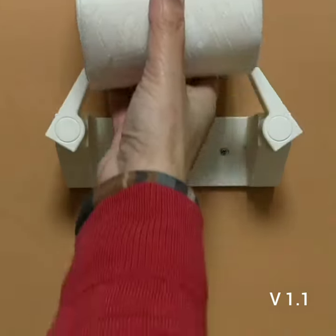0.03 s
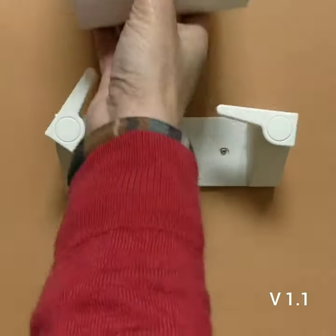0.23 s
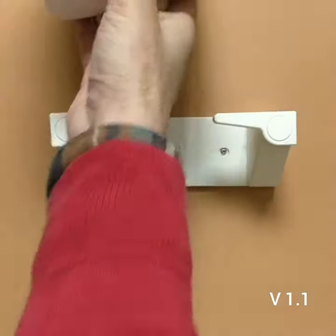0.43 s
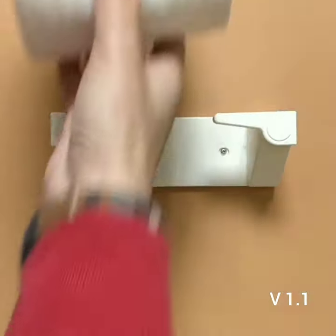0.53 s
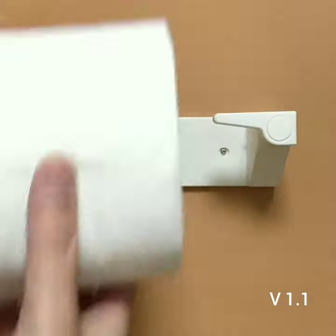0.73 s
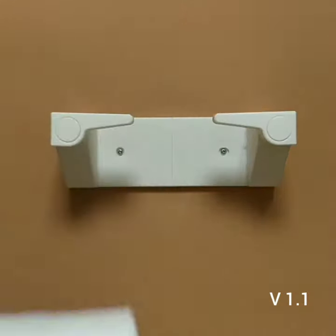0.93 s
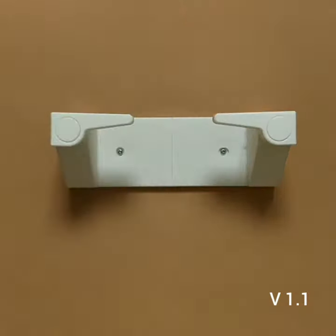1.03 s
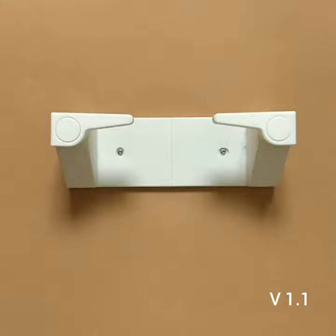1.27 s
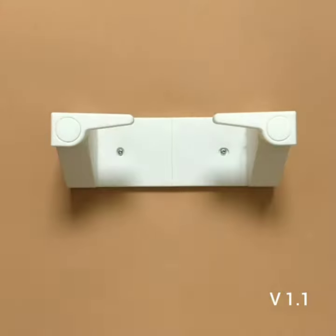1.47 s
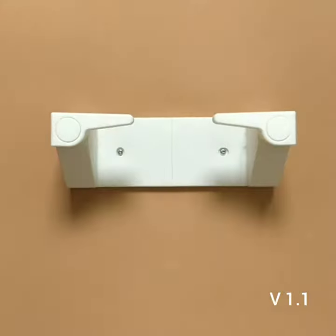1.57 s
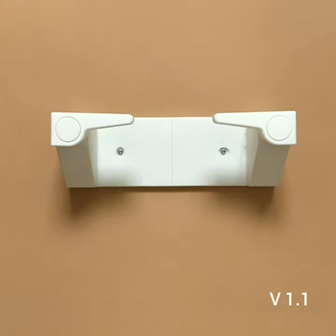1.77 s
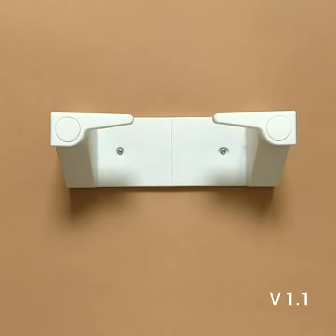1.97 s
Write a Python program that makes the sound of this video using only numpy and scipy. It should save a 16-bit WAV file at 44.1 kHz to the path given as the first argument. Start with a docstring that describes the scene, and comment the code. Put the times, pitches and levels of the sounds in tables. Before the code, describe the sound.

Plastic clacks twice as a paper roll is lifted from its holder: a brief humming rub, then one arm snaps down and rattles, followed by the other. A faint brush of paper leaves only quiet room tone and soft hiss.

```python
"""A paper roll is lifted out of a plastic wall holder in a quiet room. First it rubs along the two
hinged arms: stick-slip friction makes the mount hum, and the paper scratches. The right arm drops
shut at about 0.2 s and the left at 0.4 s; each cracks, bounces and rattles, every impact exciting
the arm's modes and swelling into a hollow knock of the mount. Near 0.75 s the roll brushes faintly
past, leaving only room tone and a soft recorder hiss."""
import sys
import numpy as np
from scipy import signal
from scipy.fft import rfft, irfft
from scipy.io import wavfile
from scipy.ndimage import uniform_filter1d

SR = 44100
rng = np.random.default_rng(int(sys.argv[2]) if len(sys.argv) > 2 else 0)


def generate_wav(sig):
    """Save sig (samples, or channels by samples) to the path in sys.argv[1] as 16-bit PCM at SR."""
    pcm = np.round(np.clip(np.atleast_2d(sig).T, -1, 1) * 32767).astype(np.int16)
    wavfile.write(sys.argv[1], SR, pcm)


N = 88200
TIME = np.arange(N) / SR
RING_TIME = TIME[:SR // 3]


def from_db(db):
    """Amplitude grows tenfold per 20 dB."""
    return 10 ** (np.asarray(db) / 20)


def rms_one(x):
    """Normalisation to unit mean power."""
    return x / np.sqrt(np.mean(x ** 2) + 1e-20)


def level(curve):
    """Amplitude envelope through (time [s], level [dB]) points."""
    return from_db(np.interp(TIME, *np.transpose(curve)))


def decay(t60, t=TIME):
    """Exponential damping: 60 dB in t60 seconds."""
    return np.exp(-np.log(1000) * t / t60)


def noise(colour):
    """Spectral shaping of white noise, at unit rms."""
    hz, db = np.transpose(colour)
    bins = np.maximum(np.fft.rfftfreq(N, 1 / SR), 1)
    gain = from_db(np.interp(np.log(bins), np.log(hz), db))
    return rms_one(irfft(rfft(rng.standard_normal(N)) * gain, N))


def ring(modes, scatter_db=0, detune=0):
    """Free vibration is a sum of damped modes; strength and pitch may scatter from blow to blow."""
    out = np.zeros(len(RING_TIME))
    for k, (hz, db, t60) in enumerate(modes):
        gain = (-1) ** k * from_db(db + scatter_db * rng.standard_normal())
        pitch = hz * (1 + detune * rng.standard_normal())
        out += gain * decay(t60, RING_TIME) * np.sin(2 * np.pi * pitch * RING_TIME)
    return out


def add(out, s, sound):
    """Superposition of a sound starting at s seconds."""
    start = int(s * SR)
    part = sound[:N - start]
    out[start:start + len(part)] += part


def high_pass(x, hz):
    """Second-order roll-off below hz."""
    return signal.sosfilt(signal.butter(2, hz, "high", fs=SR, output="sos"), x)


def background():
    """Noise floor: steady room tone under a soft recorder hiss that swells and ebbs."""
    # spectra of room tone and hiss: (frequency [Hz], relative density [dB])
    air_colour = [(15, -23), (25, 2.5), (70, -4.5), (93, -1.5), (204, -8), (380, -7), (418, -11.5),
                  (471, -10), (543, -16), (1310, -16.5), (7500, -28.5), (9750, -62.5), (16500, -120)]
    hiss_colour = [(200, -9.5), (900, 7), (1500, 0), (3000, -5), (8000, -21.5)]
    # envelope of the hiss: (time [s], level [dB])
    hiss = [(0, -87.5), (.6, -78), (.88, -69.5), (1.1, -71), (1.4, -79.5), (2, -74)]
    return from_db(-66.5) * noise(air_colour) + level(hiss) * noise(hiss_colour)


def rubbing(slips_per_s=680):
    """Stick-slip friction: tiny random slips of paper on plastic set the mount humming."""
    # envelope of the hum: (time [s], level [dB])
    envelope = [(0, -46), (.025, -62), (.058, -65.5), (.064, -51), (.1, -60), (.107, -39), (.135, -45.5),
                (.19, -36), (.222, -34), (.26, -65), (.3, -96.5)]
    # rubbed modes: (frequency [Hz], relative level [dB], t60 [s])
    modes = [(557.5, -0.5, 0.098), (618, -3, .08), (755, -12, .06)]
    slips = (rng.random(N) < slips_per_s / SR) * rng.standard_normal(N)
    hum = signal.fftconvolve(slips, ring(modes))[:N]
    hum = high_pass(np.roll(hum, N // 2), hz=433)  # shifted so it already sounds at the start
    power = uniform_filter1d(hum ** 2, size=500)
    return level(envelope) * hum / np.sqrt(power + 1e-12)


def scratch():
    """Sliding friction of the paper gives broadband noise."""
    # envelope of the scratch: (time [s], level [dB])
    envelope = [(0, -75.5), (.095, -84), (.11, -66), (.16, -61), (.2, -54), (.222, -38), (.24, -59.5),
                (.3, -90.5)]
    # its spectrum: (frequency [Hz], relative density [dB])
    colour = [(80, -10), (180, -3), (320, -4), (800, 0.5), (1700, 3.5), (2600, -12), (4500, -20),
              (8000, -28.5)]
    return level(envelope) * noise(colour)


def knock(hz, swell_s):
    """Resonance: the mount's main mode takes up the blow over a few cycles, then dies."""
    age = RING_TIME / swell_s
    return (age * np.exp(1 - age)) ** 1.2 * np.sin(2 * np.pi * hz * RING_TIME)


def arm(hits, modes, clatter_rise_s=0.0012):
    """Impact excitation: each contact rings the arm, knocks the mount and adds a burst of clatter."""
    # weaker modes of mount and wall: (frequency [Hz], level against the knock [dB], t60 [s])
    mount_modes = [(160, -28, 0.11), (240.3, -34.5, 0.067), (339.6, -33, 0.25), (459.5, -25.5, 0.12),
                   (641.6, -19, 0.27)]
    # dense, short-lived modes of the plastic: (frequency [Hz], relative density [dB])
    clatter_colour = [(40, -44), (110, -12.5), (200, -1), (450, 10), (800, 10), (1300, 6), (2200, 1.5),
                      (3200, -8), (4200, -13.5), (5300, -15), (6800, -22.5), (7800, -27.5)]
    out, clatter_power = np.zeros((2, N))
    burst = decay(t60=0.076) * (1 - np.exp(-TIME / clatter_rise_s))
    mount = ring(mount_modes)
    for s, ring_db, clatter_db, knock_db, hz, swell_s in hits:
        arm_ring = ring(modes, scatter_db=2.5, detune=0.0091) / 2  # varies at random with each blow
        add(out, s, from_db(ring_db) * arm_ring)
        add(out, s, from_db(knock_db) * (knock(hz, swell_s) + mount))
        add(clatter_power, s, (from_db(clatter_db) * burst) ** 2)  # incoherent bursts add in power
    return out + np.sqrt(clatter_power) * noise(clatter_colour)


def right_arm():
    """Elastic rebound: the first arm drops shut in a run of impacts."""
    # contacts: (time [s], relative ring [dB], clatter [dB], knock [dB], knock pitch [Hz], swell [s])
    hits = [(.2170, -45, -40, -32, 552, 0.0016), (.2268, -19.5, -22.5, -17.5, 608, 0.0067),
            (.2312, -29, -35, -51, 620, 0.0033), (.2455, -57.5, -37, -18.5, 605, 0.0037),
            (.2680, -55, -44, -31, 558, 0.0024), (.3055, -58, -57, -30, 577.4, 0.0031),
            (.3155, -52, -45.5, -29.5, 625, 0.0024), (.3195, -38.5, -30.5, -20, 644, 0.0032),
            (.3310, -49.5, -45.5, -21.5, 610, 0.0029), (.3480, -58, -54.5, -32.5, 590, 0.0033)]
    # the arm's modes: (frequency [Hz], relative level [dB], t60 [s])
    modes = [(700, -4, 0.0921), (1043, -3.5, 0.02), (1594, -9, .06), (1760, -3, .07), (2034, -11.5, 0.16),
             (2330, -2.5, .04), (2840, -0.5, 0.041), (3055, -10, 0.044), (3253, -4, .03), (3902, -8.5, .04),
             (4832, -11.5, .04), (7300, -13.5, 0.0094)]
    return arm(hits, modes)


def snaps():
    """A hard impact excites high frequencies: each arm cracks brightly once, as it lands."""
    # landings: (time [s], level [dB], t60 [s], upper cutoff [Hz])
    landings = [(0.2271, -36, 0.038, 9500), (0.394, -31.5, .06, 6624)]
    # spectrum of a crack: (frequency [Hz], relative density [dB])
    colour = [(100, -40.5), (1000, -5), (3000, 10.5), (4100, -0.5), (5200, 7.5), (6700, 0.5), (7600, -2.5),
              (8600, -15)]
    out = np.zeros(N)
    for s, db, t60, top_hz in landings:
        crack = signal.sosfilt(signal.butter(8, top_hz, fs=SR, output="sos"), noise(colour))
        add(out, s, from_db(db) * decay(t60) * crack)
    return out


def left_arm():
    """The second arm rebounds for longer and rings at its own natural frequencies."""
    # contacts: (time [s], relative ring [dB], clatter [dB], knock [dB], knock pitch [Hz], swell [s])
    hits = [(.3950, -22.5, -26, -18.5, 540, .006), (.3982, -24, -32, -30, 558.5, 0.003),
            (.4050, -28, -30, -9.5, 563, 0.0053), (.4110, -31, -29, -35.5, 559.2, 0.0037),
            (.4295, -40.5, -47.5, -40, 560, .004), (.4420, -51, -55, -25, 563, .009),
            (.4840, -38, -33.5, -14.5, 569.6, 0.0057), (.4930, -35, -34, -21, 567, 0.0024),
            (.5150, -52.5, -52, -30.5, 523, .003), (.5310, -50, -42.5, -17, 556.7, 0.01),
            (.5392, -34.5, -33, -18.5, 562.4, 0.0096), (.5710, -59, -37, -29, 535, 0.0013),
            (.5780, -42.5, -45, -53, 550, 0.0038), (.5900, -44.5, -40, -49, 576, 0.012),
            (.6130, -62, -65, -42.5, 523, 0.0029)]
    # the arm's modes: (frequency [Hz], relative level [dB], t60 [s])
    modes = [(670.4, -2.5, 0.21), (1390, -9.5, 0.045), (1590, 1, .075), (1730, -6, .08), (1850, -9.5, 0.18),
             (2400, -5, 0.029), (2854, 1.5, 0.06), (2915, -7.5, 0.037), (3230, -14.5, .035),
             (3534, -10.5, 0.045), (4795, -12, 0.048), (5167, -16.5, 0.052), (5430, -17, 0.047),
             (6430, -18.5, 0.066)]
    return arm(hits, modes)


def brush():
    """Light friction gives faint, high noise as the roll passes."""
    # envelope of the brushing: (time [s], level [dB])
    envelope = [(.72, -101), (.74, -69), (.757, -62.5), (.785, -75.5), (.83, -79), (.95, -90.5)]
    # its spectrum: (frequency [Hz], relative density [dB])
    colour = [(500, -31.5), (1600, -15), (2100, -1.5), (2600, -3), (3500, -16), (4600, -7.5), (6000, -18.5),
              (8000, -24)]
    return level(envelope) * noise(colour)


def room(x, build_s=.012):
    """Reverberation: diffuse reflections build up quickly and die away octave by octave."""
    # reverberant octave bands: (centre [Hz], gain [dB])
    bands = [(125, -4.5), (250, -4.5), (500, -14), (1000, -3), (2000, -4), (4000, -8.5), (8000, -11.5)]
    # reverberation time of each band: (t60 [s])
    decay_times = [.38, .38, .36, .46, .37, .42, .38]
    response = np.zeros(N)
    for (hz, db), t60 in zip(bands, decay_times):
        octave = signal.butter(3, [hz / np.sqrt(2), hz * np.sqrt(2)], "band", fs=SR, output="sos")
        reflections = signal.sosfilt(octave, rng.standard_normal(N))
        shape = decay(t60) * (1 - np.exp(-TIME / build_s))
        response += from_db(db) * reflections * shape / np.sqrt(np.sum(shape ** 2))
    return signal.fftconvolve(x, response)[:N]


def scene():
    """Superposition of direct sound, noise floor and reverberation."""
    impacts = right_arm() + left_arm() + snaps()
    friction = rubbing() + scratch() + brush()
    holder = high_pass(impacts + friction, hz=89)  # the small holder radiates little bass
    return (holder + background() + room(holder))[None]


def record(dry, cutoff_hz=7900):
    """Band limiting: a steep low-pass filter cuts the top."""
    return signal.sosfilt(signal.ellip(8, .5, 60, cutoff_hz, fs=SR, output="sos"), dry)


dry = scene()
out = record(dry)
generate_wav(out)
```